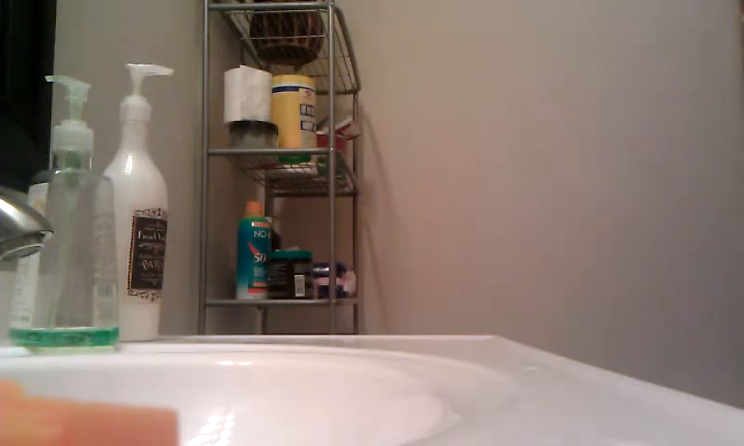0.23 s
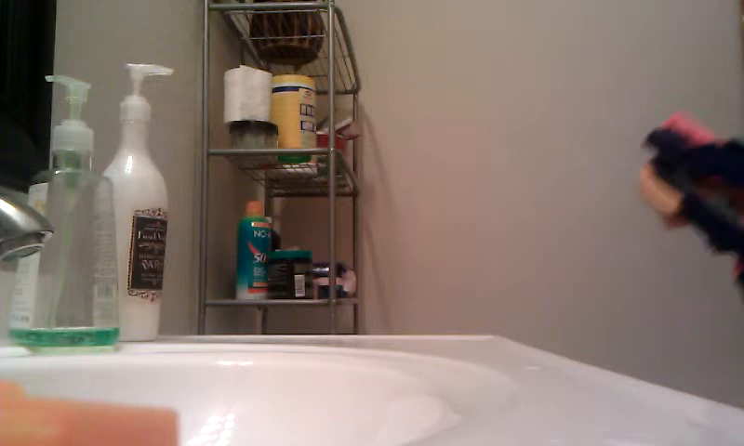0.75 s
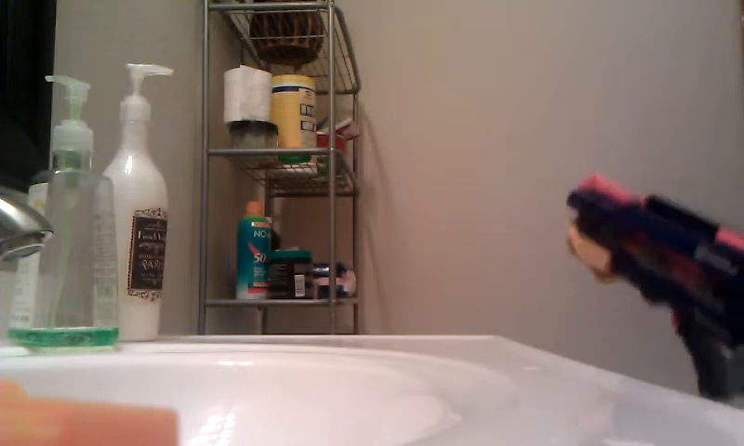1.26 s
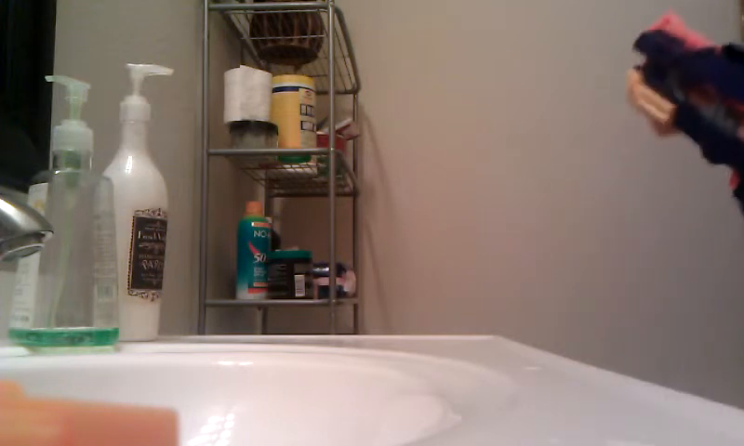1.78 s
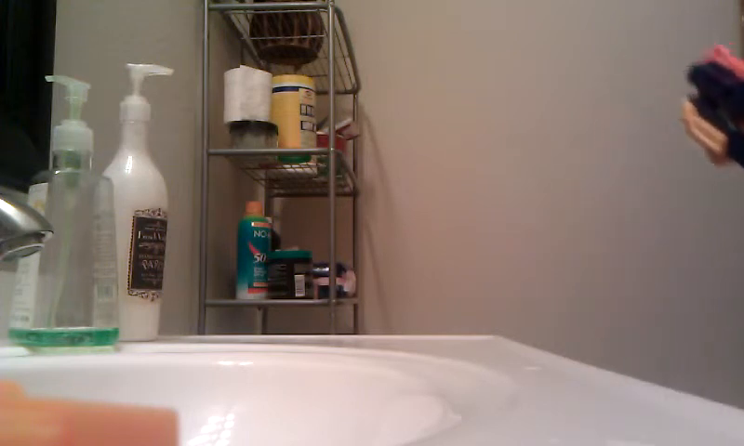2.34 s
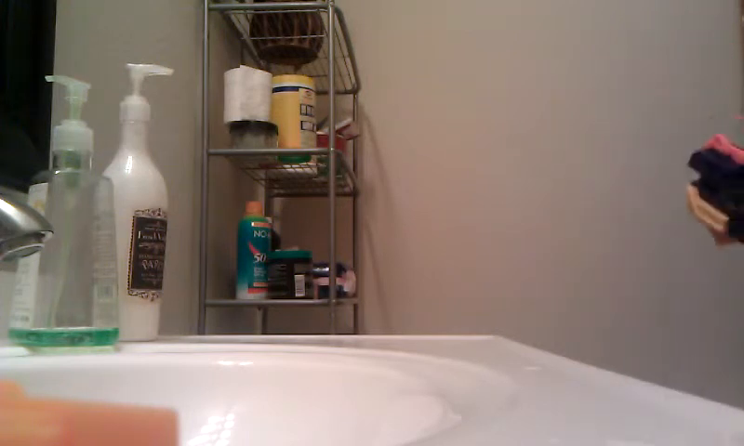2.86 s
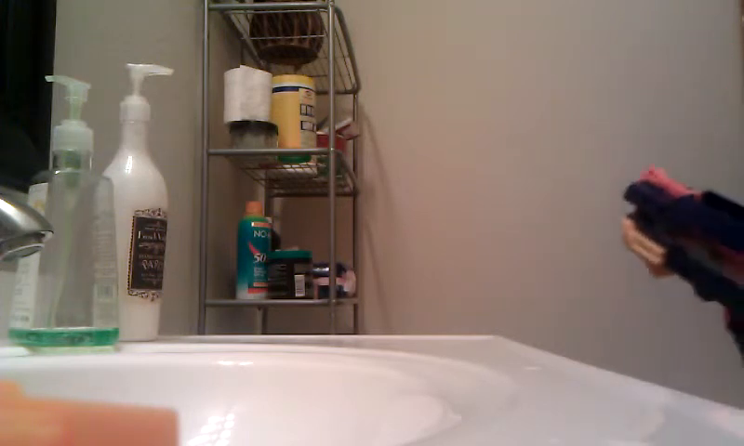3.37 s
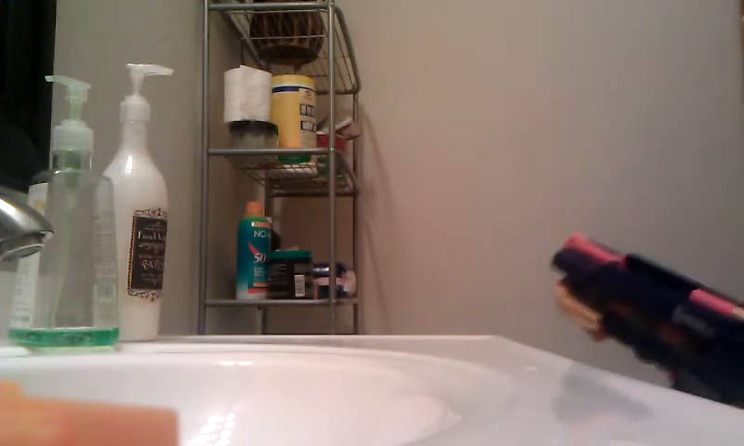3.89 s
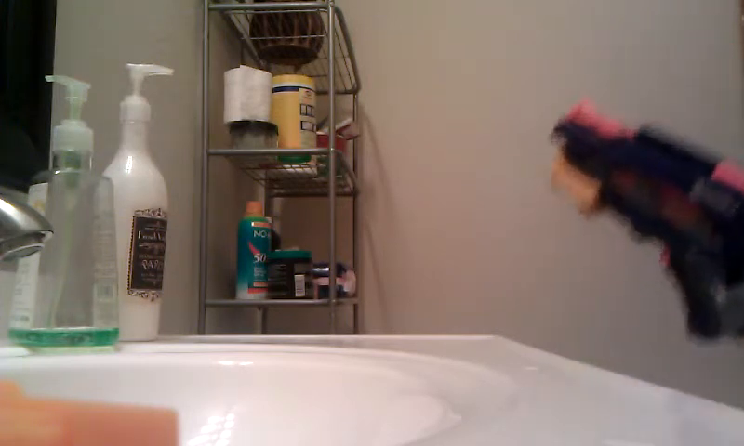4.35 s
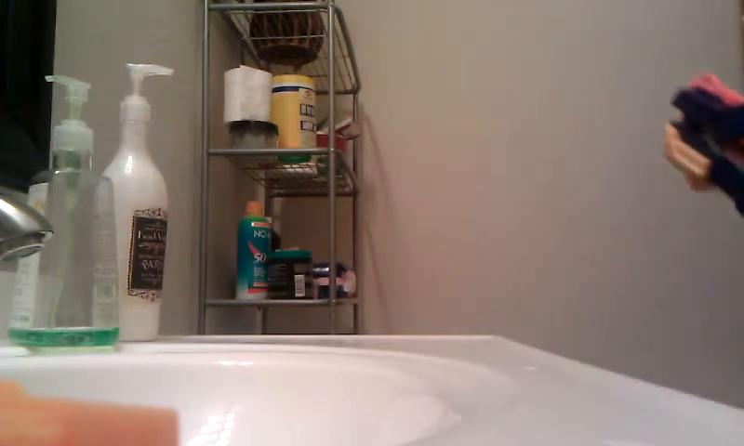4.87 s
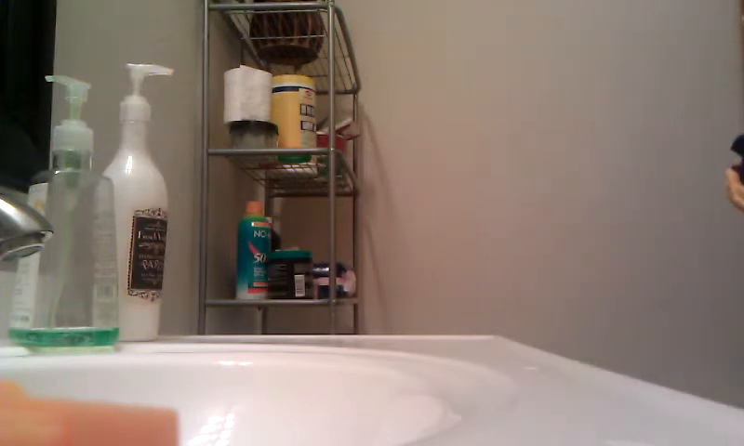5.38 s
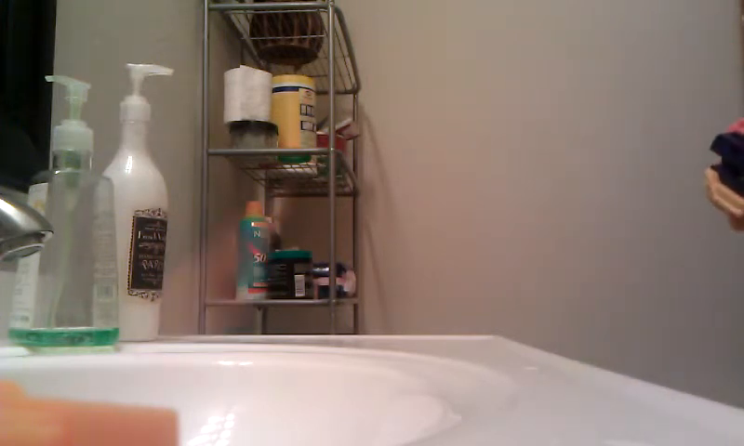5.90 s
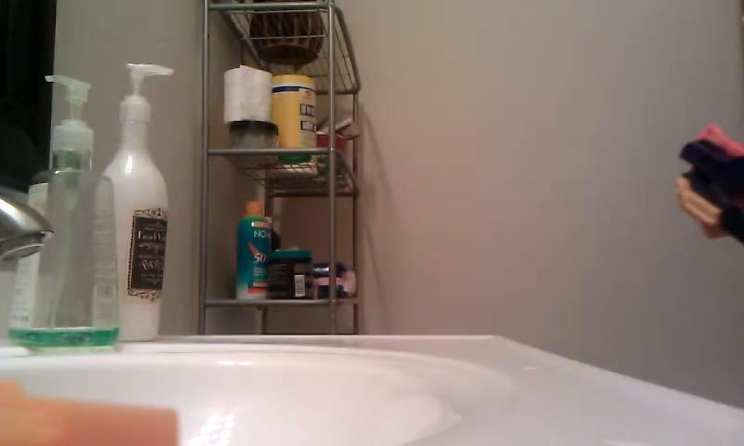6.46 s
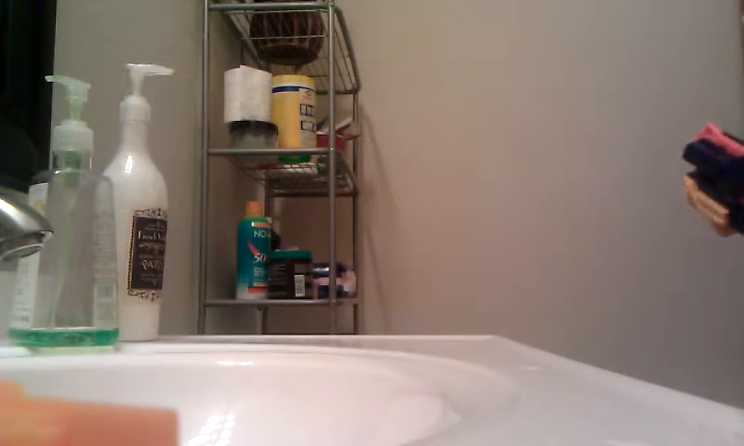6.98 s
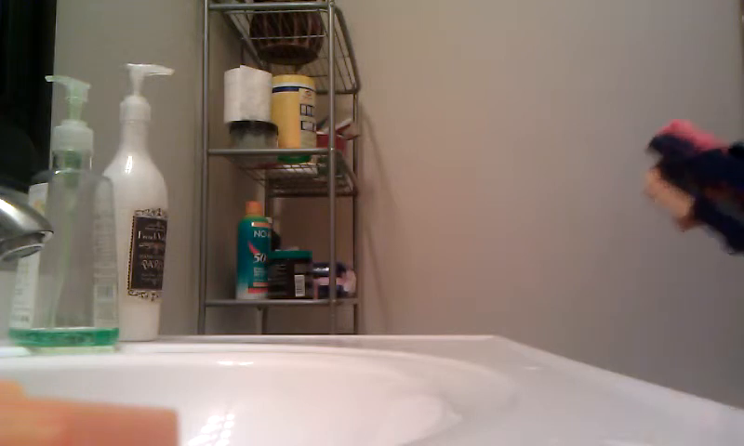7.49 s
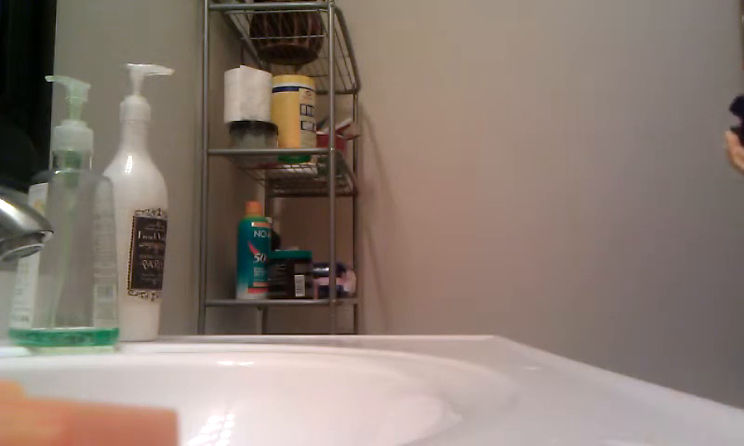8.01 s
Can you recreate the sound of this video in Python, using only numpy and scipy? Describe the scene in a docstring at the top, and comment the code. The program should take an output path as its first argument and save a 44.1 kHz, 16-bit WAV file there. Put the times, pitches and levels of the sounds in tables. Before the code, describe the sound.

A plastic toy blaster snaps hard right at the start, ringing in a small, hard-walled bathroom. Uneven clicks and rattles of handling follow, with a short slide rub and two brief squeaks before 1 second. Spring clacks land at about 1.1, 1.5 and 1.9 seconds, then a very loud slam at 2.6. Between 3.5 and 3.9 seconds the slide rubs and squeaks twice, ending in a clack. More snaps come at 4.3 and 4.8 seconds, and a heavy, longer rattling slam at 5.4. Lighter ticks and another squeak follow around 6.3 seconds. A clack at 7.1 leads to a quick cluster with scraping from 7.5 to 7.7, and a last sharp snap near 8.2. Each contact echoes for about half a second. The hardest hits overload the small mono microphone and flatten into short rushes. Faint room noise and a low hum lie underneath.

```python
"""Toy blaster in a bathroom

A plastic toy blaster is handled, cocked and dry-fired over a sink. Catches let go and the spring slams
home; in between, parts clack, tick, rub and squeak, and the hard-walled room rings after each contact.
A small mono microphone overloads on the hardest snaps, and its limiter flattens them into long rushes."""
import sys
import numpy as np
from scipy import signal
from scipy.fft import rfft, irfft
from scipy.io import wavfile

SR = 44100
rng = np.random.default_rng(int(sys.argv[2]) if len(sys.argv) > 2 else 0)


def to_wav(s):
    """Save 16-bit WAV."""
    ch = np.atleast_2d(s).T  # columns
    pcm = np.round(np.clip(ch, -1, 1) * 32767)  # PCM
    wavfile.write(sys.argv[1], SR, pcm.astype(np.int16))


N = 363825


def slams(snap_db=3, direct_db=-9, catch_thump_db=3.5, catch_snap_db=-7, catch_rattle_s=0.013):
    """Contacts of the action: a catch lets go dully, then the spring slams slide or plunger home."""
    # spring strokes: t/s, level/dB, thump/dB, rattle decay/s, catch lead/s, catch level/dB
    blows = [(0.001, -4, 9.5, 0.014, 0.0049, -35), (1.092, -11, 3, 0.0079, 0.024, -17),
             (1.456, -12.5, 2.5, 0.011, 0.039, -27), (1.886, -7.5, -14, 0.018, 0.0013, -24),
             (2.605, 4, 8.5, .017, 0.0072, -30), (3.866, -10.5, 4.5, .022, 0.0027, -10),
             (4.311, -11.5, 4.5, 0.0066, .024, -23.5), (4.8, -4.5, -8, 0.011, 0, -27),
             (5.435, -1.5, 9.5, 0.05, 0.0085, -30), (7.069, -9, 5.5, 0.0141, .009, -38),
             (7.497, -12, 4.5, 0.0075, 0.025, -26), (7.658, -6, -9, 0.0075, .038, -21),
             (7.696, -8, -18, 0.0097, 0.018, -28), (8.217, -4.5, -1, 0.0058, .002, -25)]
    contacts = []
    for s, level_db, thump_db, rattle_s, lead_s, catch_db in blows:
        contacts.append((s - lead_s, catch_db, catch_thump_db, catch_snap_db, catch_rattle_s, direct_db))
        contacts.append((s, level_db, thump_db, snap_db, rattle_s, direct_db))
    return contacts


def fumbles(gap_s=0.036, uneven=0.2, spread_db=3.3, thump_db=1, snap_db=-7.5, rattle_s=0.02, direct_db=-6):
    """Contacts of a shifting grip: loose parts tick in uneven runs that swell or fade."""
    # grip shifts: start/s, length/s, first level/dB, last level/dB
    shifts = [(0.53, .15, -26, -27), (2.103, .04, -32.5, -28.5), (2.567, .02, -36.5, -36),
              (3.08, .06, -32, -36), (3.463, .02, -33, -36), (3.73, .02, -22, -26), (4.115, .01, -30, -28),
              (5.284, .02, -32.5, -26), (5.887, .08, -35.5, -66), (6.254, .07, -30, -22.5),
              (6.554, .045, -27.5, -24), (6.972, .07, -36, -29.5), (7.429, .02, -26.5, -31),
              (8.017, .02, -38, -38)]
    contacts = []
    for start_s, length_s, first_db, last_db in shifts:
        s = start_s
        for timing, accent in rng.standard_normal((8, 2)):
            if s <= start_s + length_s:
                ramp_db = first_db + (last_db - first_db) * (s - start_s) / length_s
                contacts.append((s, ramp_db + spread_db * accent, thump_db, snap_db, rattle_s, direct_db))
            s += gap_s * np.exp(uneven * timing)
    return contacts


def clacks(span_s=0.028, crack_db=1.5, crack_s=0.0041, part_db=4, shell_db=2, graze_db=-19, graze_s=0.0073):
    """Every knock, slam and tick rattles the plastic; returns the room send and the direct sound."""
    # parts knocking in the hands: t/s, level/dB, thump/dB, snap/dB, rattle decay/s, direct sound/dB
    knocks = [(0.297, -20, -0.5, 0.5, .026, -7), (0.38, -23.5, 7, 10.5, 0.019, -4.5),
              (0.701, -21.5, -5, -0.5, 0.051, -7), (0.798, -20, 0, 4.5, 0.019, -3.5),
              (0.893, -21.5, -10, -4, 0.025, -1.5), (0.965, -22, -1.5, 0, 0.022, -1.5),
              (1.271, -25, 3, 10, .02, -1), (1.67, -17, 6.5, -26, 0.032, -8.5),
              (1.752, -15.5, -3, 2, 0.022, -10), (1.804, -20, -13, 7, 0.0065, -7.5),
              (2.212, -30.5, 0.5, 8, 0.011, -7), (2.233, -32.5, -3, -11, 0.016, 4.5),
              (2.467, -35, 6.5, 2.5, 0.0097, -5.5), (2.967, -18.5, 4.5, -19, 0.021, -3),
              (3.197, -25, 13.5, -3, 0.0052, -4.5), (3.231, -23.5, 9.5, -4.5, 0.029, -1.5),
              (3.492, -14.5, 3.5, -7, 0.028, -9.5), (3.614, -19.5, -10, 7.5, 0.013, -21),
              (3.756, -18.5, -14, 4, 0.049, 0), (4.049, -27.5, 14, -15, 0.0055, -3),
              (4.122, -28, 8.5, 11, 0.0078, -3), (4.517, -27.5, 9, 8.5, 0.019, -4.5),
              (4.62, -19, -2, 4, 0.017, -2), (5.188, -26.5, -7, -3, 0.038, -2.5),
              (5.314, -26.5, -5.5, -6.5, 0.027, -1), (6.018, -30, 15, 3, 0.0145, -3),
              (6.348, -14, -6.5, -12, .009, -8.5), (6.431, -19.5, -5, 3, 0.039, -5),
              (6.597, -17, 1.5, -3, 0.032, -3.5), (6.751, -27, 2, -5, 0.01, -3),
              (6.9, -36.5, 4, -3, 0.011, 1.5), (6.923, -25.5, -7, 4, 0.01, -5),
              (7.06, -33, 14, -6, 0.0059, 6.5), (7.306, -28, 9, 12.5, 0.022, -1.5),
              (7.899, -24.5, 3, -6, 0.029, -9), (8.129, -23.5, -7, -2, 0.019, -2.5)]
    thump_hz, shell_hz, snap_hz = (250, 489), (1130, 1970), 4100
    send, direct = np.zeros((2, N))
    for s, level_db, thump_db, snap_db, rattle_s, direct_db in knocks + slams() + fumbles():
        strength = from_db(level_db) * np.sqrt(span_s * SR)
        hit = rattle(rattle_s)
        # each part has a few resonances of its own
        for hz in np.geomspace(900, 7500, 64)[rng.integers(0, 64, 4)]:
            hit = equalise(hit, [hz / 1.04, hz * 1.04], "band", part_db)
        hit = strength * unit_energy(hit)
        # where the blow lands sets the hollow body's thump and the edges' snap; the shell always clacks
        hit = equalise(hit, thump_hz, "band", thump_db)
        hit = equalise(hit, shell_hz, "band", shell_db)
        hit = equalise(hit, snap_hz, "high", snap_db)
        add(send, s, hit)
        # the first crack leaves the open surface; the later rattle is shut inside
        crack = np.exp(-np.arange(len(hit)) / (SR * crack_s))
        add(direct, s, from_db(direct_db + crack_db * crack) * hit)
        # parts graze each other just before they meet
        add(send, s - graze_s, strength * from_db(graze_db) * rattle(graze_s))
    return send, direct


def rattle(decay_s, size=8192):
    """A dying run of tiny impacts, evened out so that it favours no pitch; energy 1."""
    dying = np.exp(-np.arange(size) / (SR * max(decay_s, 1e-3)))
    bound = 7 * unit_energy(dying)
    force = chatter(size, per_s=2500, spread_db=5) * dying
    for _ in range(3):
        flat = irfft(np.exp(1j * np.angle(rfft(force))))   # whiten the spectrum
        force = np.clip(flat, -bound, bound)   # hold it inside the decay
    return unit_energy(force)


def chatter(count, per_s, spread_db):
    """Tiny impacts of uneven size at random moments; rms 1."""
    sizes = from_db(spread_db * rng.standard_normal(count)) * rng.choice([-1, 1], count)
    return unit_energy(sizes * (rng.random(count) < per_s / SR)) * np.sqrt(count)


def rubs():
    """The slide rubs in its track, plastic catching on plastic in a dense run of small slips."""
    # slide moves: start/s, length/s, level/dB
    moves = [(0.575, 0.15, -29.5), (3.522, 0.13, -20.5), (3.756, 0.14, -25.5), (6.336, 0.096, -34),
             (6.582, 0.044, -24), (7.523, 0.15, -21)]
    out = np.zeros(N)
    for s, length_s, level_db in moves:
        count = int(length_s * SR)
        slips = chatter(SR // 2, per_s=700, spread_db=6.5)[:count]
        add(out, s, from_db(level_db) * stroke(count) * slips)
    return butter(butter(out, 520, "high", order=1), 5200, "low", order=1)


def squeaks(unsteady_hz=110, trim_db=-7, fade_db=-4):
    """Stick and slip lock into a rough, gliding tone that bites at once and then eases."""
    # tight spots: start/s, length/s, first f/Hz, last f/Hz, level/dB
    tight_spots = [(0.699, 0.034, 920, 792, -26), (0.888, 0.048, 1810, 1603, -22),
                   (3.522, 0.12, 1431, 1520, -23), (3.753, 0.088, 1532, 1710, -23.5),
                   (6.347, 0.069, 1343, 1562, -21.5), (7.886, 0.057, 902, 688, -31.5),
                   (8.013, 0.042, 2560, 2550, -37.5)]
    out = np.zeros(N)
    for s, length_s, first_hz, last_hz, level_db in tight_spots:
        count = int(length_s * SR)
        grip = butter(rng.standard_normal((2, SR // 2)), unsteady_hz, "low")[:, :count]
        phase = 2 * np.pi * np.cumsum(np.linspace(first_hz, last_hz, count)) / SR
        pressure = np.sqrt(stroke(count)) * from_db(np.linspace(0, fade_db, count))
        tone = pressure * (grip[0] * np.cos(phase) + grip[1] * np.sin(phase))
        add(out, s, from_db(level_db + trim_db) * np.sqrt(count) * unit_energy(tone))
    return out


def stroke(count):
    """Hand pressure swells and lets go."""
    return np.sqrt(np.sin(np.pi * (np.arange(count) + .5) / count))


def rings(span_s=0.021):
    """A blow leaves a panel, the spring or the hollow grip ringing with a damped tone."""
    # ringing parts: t/s, f/Hz, level/dB, t60/s
    pings = [(1.072, 808, -25.5, 0.03), (1.271, 360, -28.5, 0.038), (2.467, 1100, -46, 0.13),
             (2.467, 2184, -45, .07), (3.198, 222, -18.5, 0.02), (4.62, 3970, -26, 0.026),
             (4.801, 748, -27, 0.028), (5.188, 2850, -44, 0.033), (6.018, 640, -37.5, 0.023),
             (6.018, 3540, -39.5, 0.035)]
    out, t = np.zeros(N), np.arange(SR // 2) / SR
    for s, hz, level_db, t60 in pings:
        tone = np.sin(2 * np.pi * hz * t) * from_db(-60 * t / t60)
        add(out, s, from_db(level_db) * np.sqrt(span_s * SR) * unit_energy(tone))
    return out


def bathroom(send, wet_db=-1, wall_db=-1.0, wall_hz=4500, build_s=0.00065, stretches=24):
    """Hard walls return dense reflections that die band by band, and a few standing waves."""
    # reverb time by band: f/Hz, t60/s
    reverb_times = [(150, 0.42), (350, 0.64), (700, 0.69), (1500, 0.57), (3700, 0.53), (8000, 0.5)]
    # standing waves between the walls: f/Hz, level/dB, t60/s
    modes = [(261.7, -25.5, 0.59), (324, -26.5, 0.67), (437, -19, 0.53), (521, -25.5, 0.68),
             (681.5, -24.5, 0.38)]
    t, hz = np.arange(SR) / SR, np.arange(SR // 2 + 1)   # one second, one bin per Hz
    centres, t60s = np.transpose(reverb_times)
    bands = np.array([at_hz(np.column_stack([centres, own]), hz) for own in np.eye(len(centres))])
    bands = bands * from_db(wall_db * hz ** 2 / (hz ** 2 + wall_hz ** 2))   # walls swallow some treble
    decays = from_db(-60 * t / t60s[:, None])
    waves = 0
    for mode_hz, level_db, t60 in modes:
        wave = np.sin(2 * np.pi * (mode_hz * t + rng.random()))
        waves = waves + from_db(level_db) * wave * from_db(-60 * t / t60)
    build = 1 - np.exp(-t / build_s)
    out, s = np.zeros(N), 0
    # the blaster keeps moving, so each stretch meets a new pattern of reflections
    for stretch in np.array_split(send, stretches):
        reflections = np.sum(irfft(rfft(rng.standard_normal(SR)) * bands) * decays, axis=0)
        add(out, s, signal.fftconvolve(stretch, unit_energy(build * (reflections + waves))))
        s += len(stretch) / SR
    return from_db(wet_db) * out


def room_tone(air_db=-56, hum_hz=177, hum_db=-67):
    """The still room: a faint bed of noise and a low hum."""
    # noise spectrum of the room: f/Hz, level/dB
    air_spectrum = [(40, -36), (100, -7), (175, -4), (250, -3.5), (700, 1.5), (2000, -11.5), (5000, -15),
                    (8000, -31)]
    air = from_db(air_db) * coloured(rng.standard_normal(N), air_spectrum)
    hum = from_db(hum_db) * np.sqrt(2) * np.sin(2 * np.pi * hum_hz * np.arange(N) / SR)
    return air + hum


def coloured(x, spectrum, mic_top_hz=8150, size=4096):
    """Minimum-phase EQ that keeps the power of white noise and ends at the microphone's top."""
    hz = np.arange(size // 2 + 1) * SR / size
    cepstrum = irfft(np.log(from_db(at_hz(spectrum, hz))))[:size // 2]
    response = irfft(np.exp(rfft(2 * cepstrum, size)))
    top = signal.ellip(8, .5, 70, mic_top_hz, fs=SR, output="sos")
    return signal.fftconvolve(x, unit_energy(signal.sosfilt(top, response)))[:len(x)]


def limiter(x, ceiling_db=-17.0, sense_s=0.0026, attack_s=0.00018, release_db_per_s=200, ahead_samples=40):
    """Look-ahead limiter: ducks when the short-term level passes the ceiling, then recovers."""
    level_db = 10 * np.log10(one_pole(x[0] ** 2, sense_s) + 1e-12)
    over_db = np.maximum(level_db - ceiling_db, 0)
    release_db = release_db_per_s * np.arange(N) / SR
    held_db = np.maximum.accumulate(over_db + release_db) - release_db
    duck_db = np.pad(one_pole(held_db, attack_s), (0, ahead_samples), "edge")[ahead_samples:]
    return x * from_db(-duck_db)


def from_db(db):
    """Decibels to gain."""
    return 10 ** (np.asarray(db) / 20)


def unit_energy(x):
    """Scale to a total energy of 1."""
    return x / np.sqrt(np.sum(x ** 2) + 1e-20)


def at_hz(points, hz):
    """Read a table along log frequency."""
    known, values = np.transpose(points)
    return np.interp(np.log(np.maximum(hz, 1)), np.log(known), values)


def butter(x, hz, kind, order=2):
    """Causal Butterworth filter."""
    return signal.sosfilt(signal.butter(order, hz, kind, fs=SR, output="sos"), x + 1e-18)


def equalise(x, hz, kind, gain_db):
    """Boost or cut with a bell ("band") or a treble shelf ("high")."""
    return x + (from_db(gain_db) - 1) * butter(x, hz, kind, order=1)


def one_pole(x, time_s):
    """Smooth with a time constant."""
    r = np.exp(-1 / (time_s * SR))
    return signal.lfilter([1 - r], [1, -r], x)


def add(track, s, sound):
    """Mix a sound into a track at time s."""
    at = int(np.clip(s * SR, 0, N - 1))
    track[at:at + len(sound)] += sound[:N - at]


def scene(parts_direct_db=-3):
    """The blaster in the ringing bathroom, over room tone; the same in both channels."""
    # tone of shell, basin and microphone together: f/Hz, level/dB
    colour = [(30, -70), (70, -31.5), (130, -24), (200, -21.5), (300, -9.5), (500, -4.5), (740, 2.5),
              (1080, -3), (1500, -2), (2500, -3.5), (4000, -6), (5100, -10.5), (5850, -18.5), (7000, -11.5),
              (7900, -15)]
    send, direct = clacks()
    parts = rubs() + squeaks() + rings()
    blaster = direct + from_db(parts_direct_db) * parts + bathroom(send + parts)
    return np.tile(coloured(blaster, colour) + room_tone(), (2, 1))


def record(dry, overload=0.6, fizz_db=3, fizz_hz=17500, cutoff_hz=15900):
    """The hardest snaps clip with a bright fizz, the limiter holds the level, and the top is cut."""
    clipped = np.clip(dry, -overload, overload)
    fizz = from_db(fizz_db) * butter(clipped - dry, fizz_hz, "high", order=1)
    high_cut = signal.ellip(10, .2, 80, cutoff_hz, fs=SR, output="sos")
    return signal.sosfilt(high_cut, limiter(clipped + fizz))


dry = scene()
out = record(dry)
to_wav(out)
```